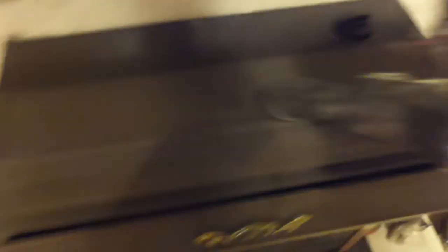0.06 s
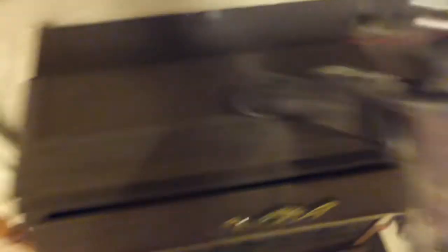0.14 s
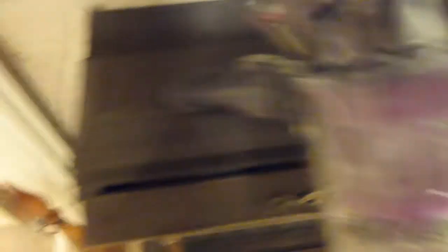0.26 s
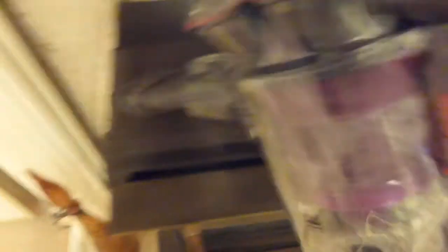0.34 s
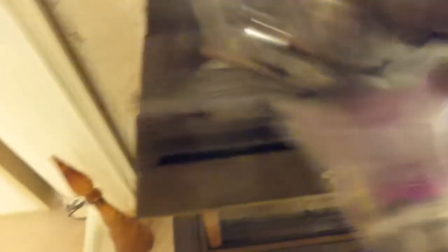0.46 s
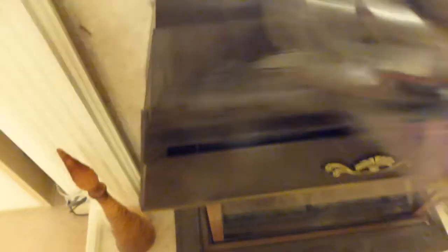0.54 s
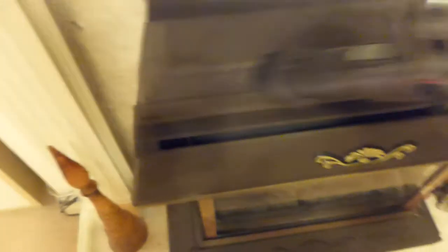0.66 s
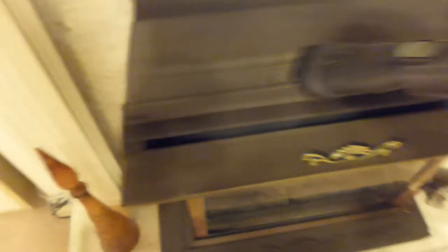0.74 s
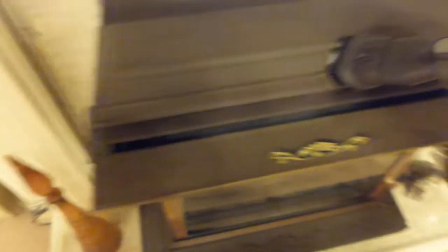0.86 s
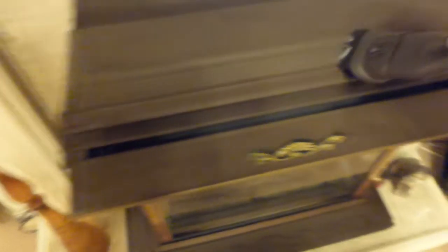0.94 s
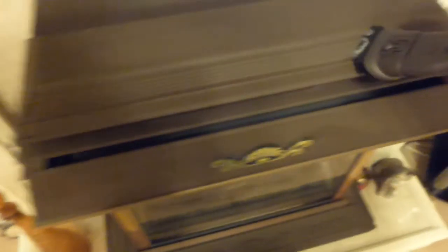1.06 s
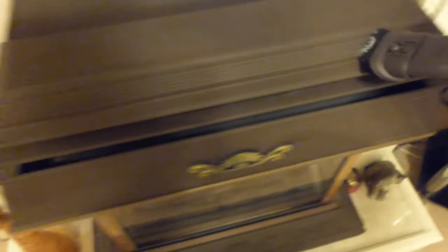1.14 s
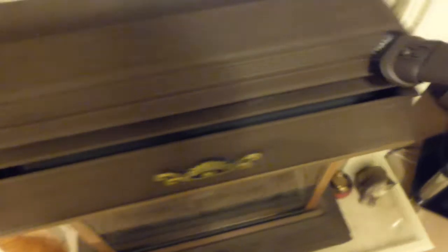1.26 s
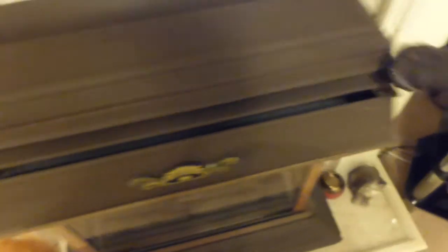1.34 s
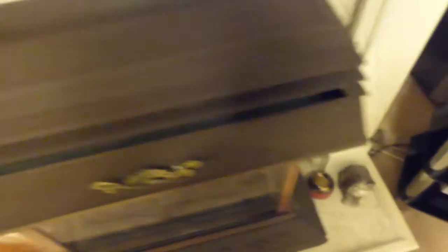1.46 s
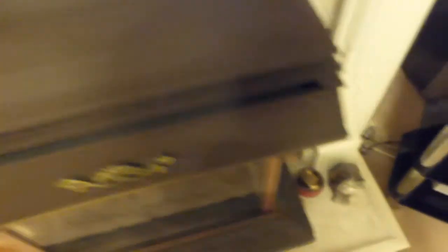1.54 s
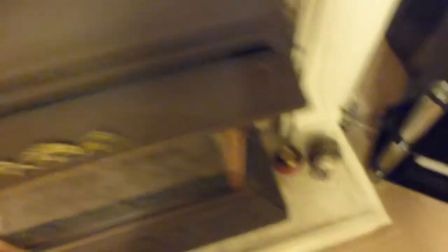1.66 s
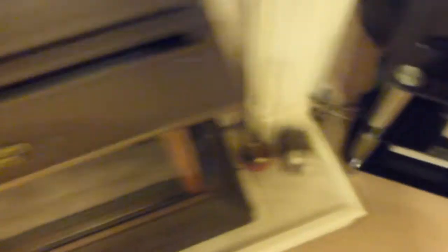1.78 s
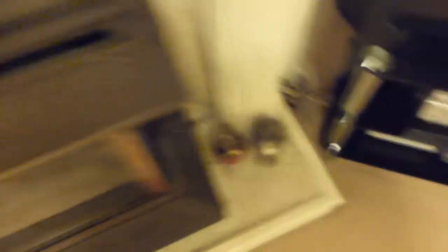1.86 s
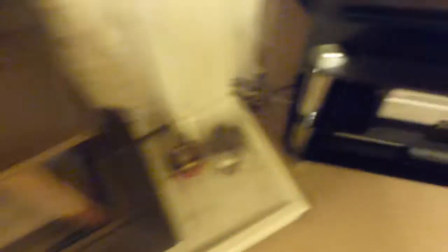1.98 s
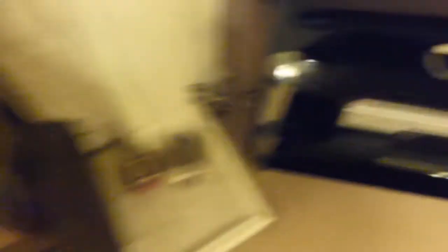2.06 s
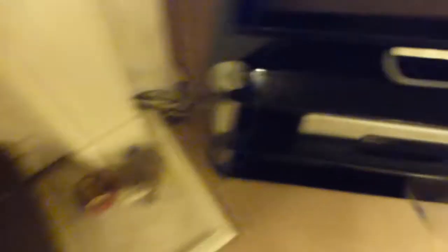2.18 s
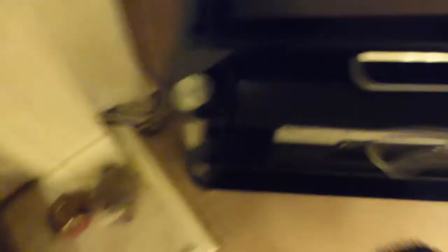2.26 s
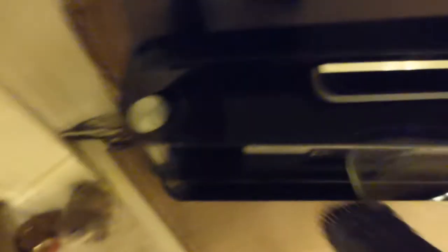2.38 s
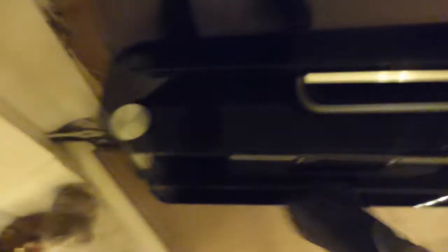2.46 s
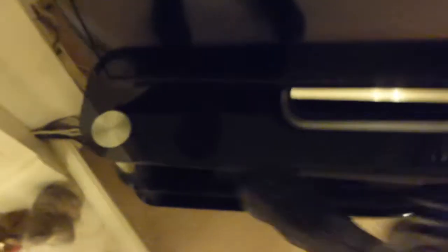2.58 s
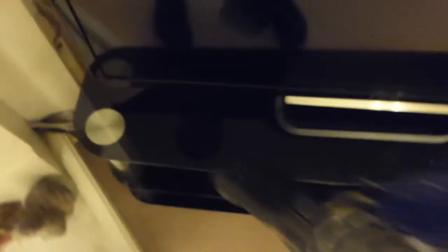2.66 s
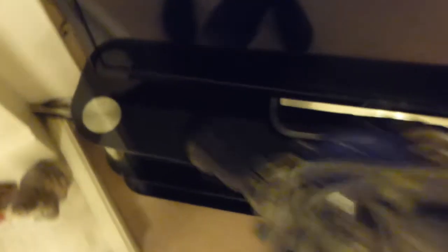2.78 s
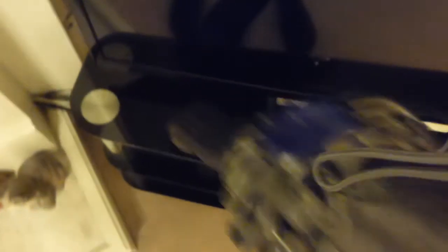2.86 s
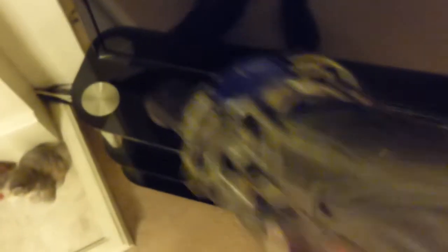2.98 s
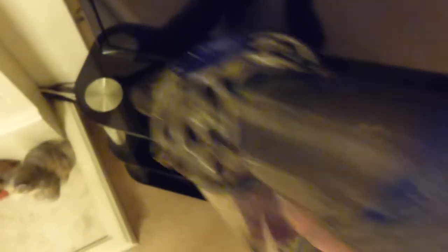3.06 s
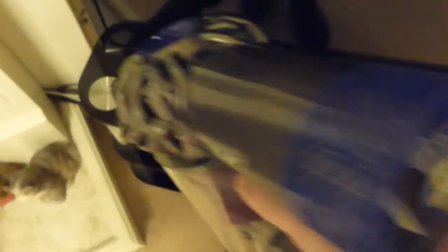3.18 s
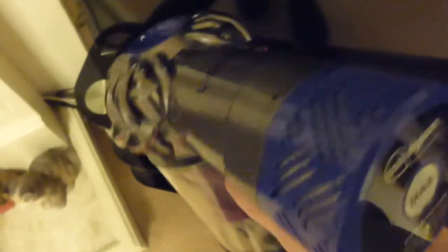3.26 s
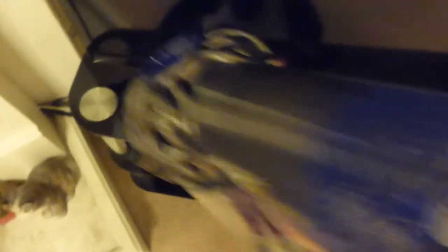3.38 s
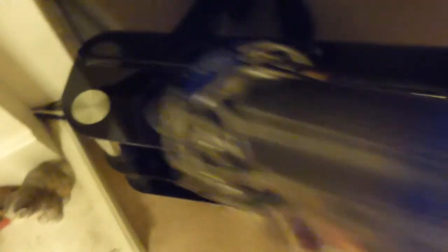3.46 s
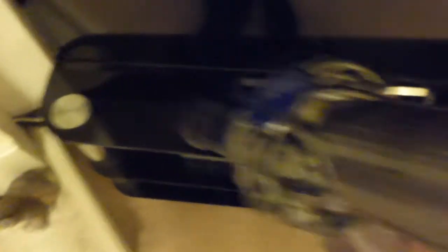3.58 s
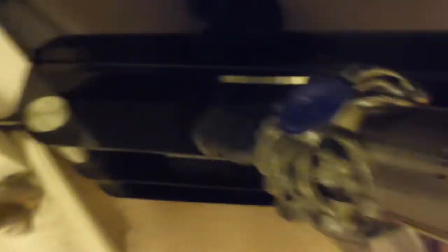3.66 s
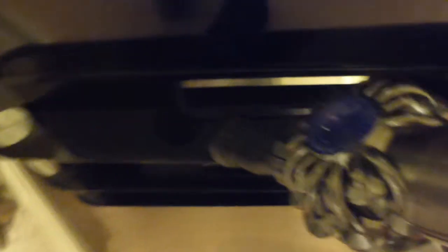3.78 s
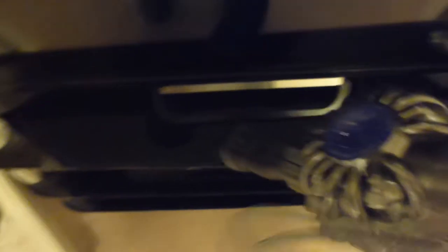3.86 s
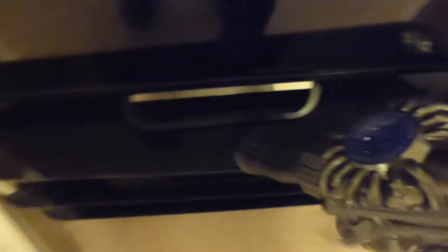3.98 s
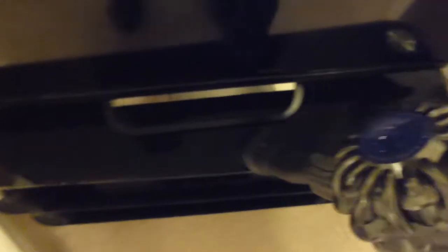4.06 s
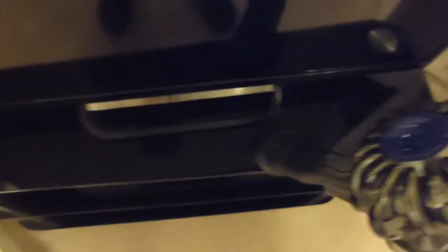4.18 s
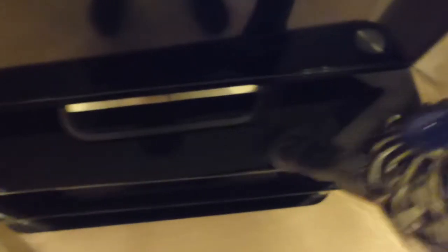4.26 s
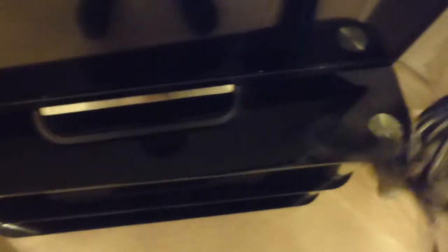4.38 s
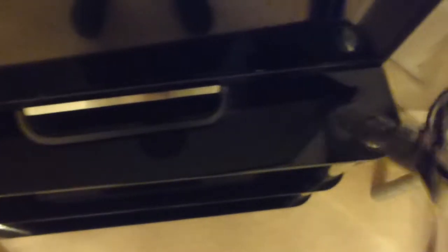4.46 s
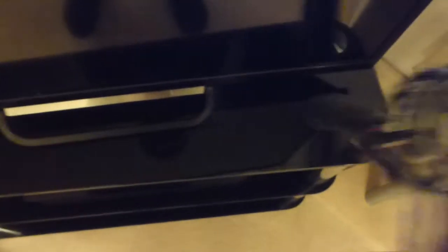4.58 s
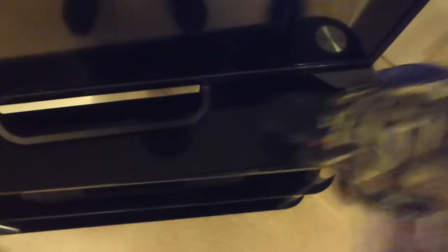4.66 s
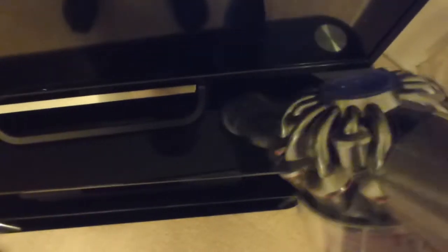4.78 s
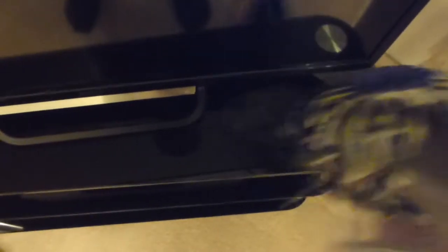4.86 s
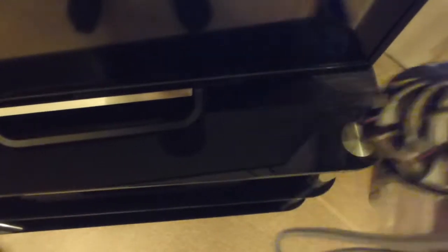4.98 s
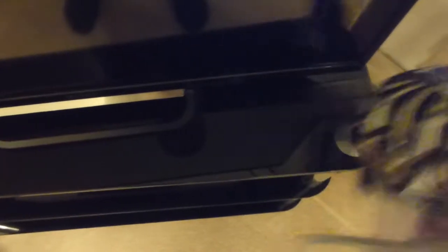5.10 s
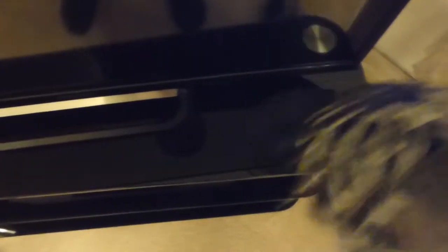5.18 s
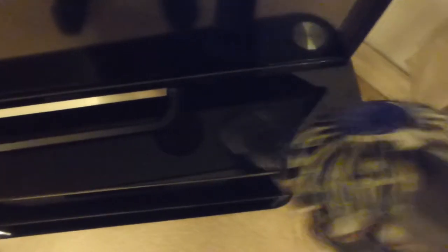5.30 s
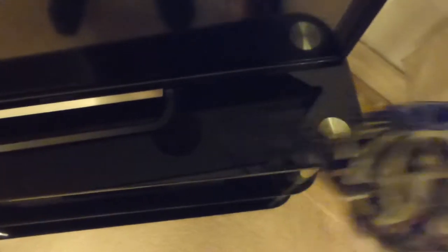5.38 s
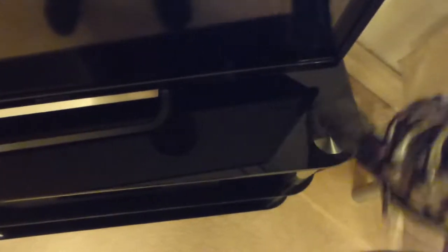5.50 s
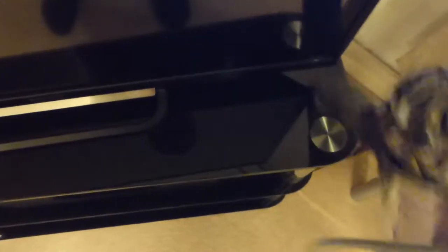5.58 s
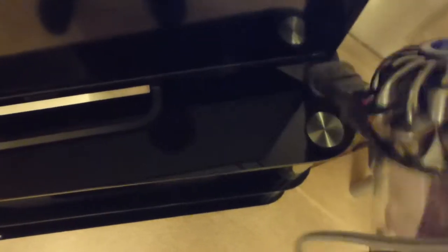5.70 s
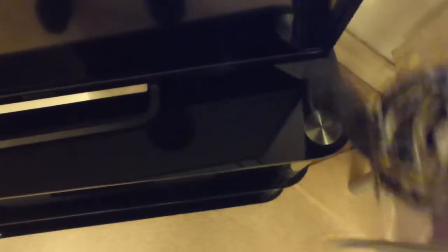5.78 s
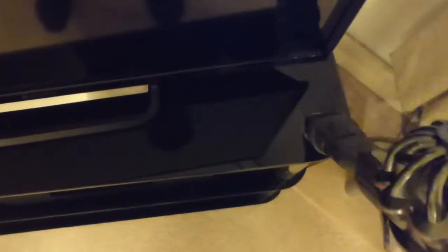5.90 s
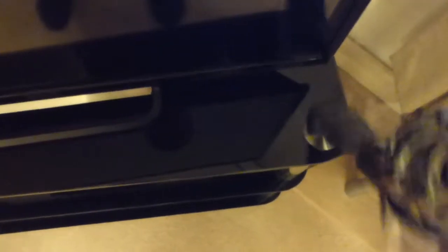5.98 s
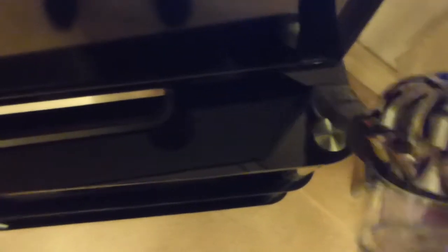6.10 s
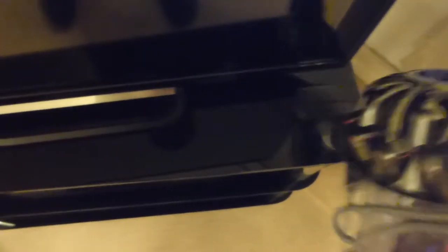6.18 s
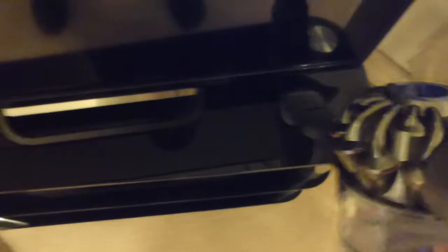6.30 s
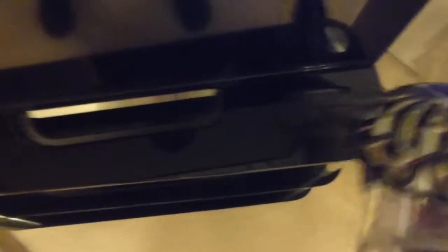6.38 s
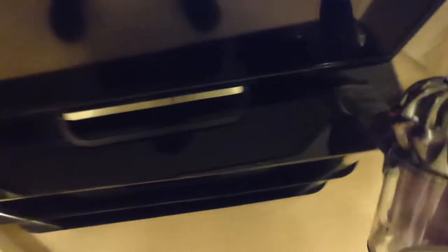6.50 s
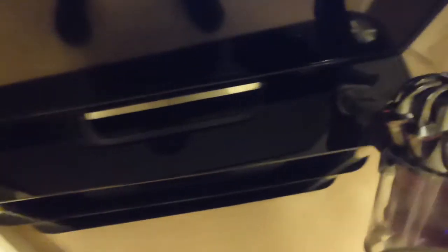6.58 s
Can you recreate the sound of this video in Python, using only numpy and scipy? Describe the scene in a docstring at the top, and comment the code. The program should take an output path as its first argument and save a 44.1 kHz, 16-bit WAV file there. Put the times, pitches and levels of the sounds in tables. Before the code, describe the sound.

Close handheld vacuum whine and suction hiss, early exhaust buffeting, a sliding wind-down, then a buzzing restart and steady running to the end.

```python
"""A cordless hand vacuum is the main source: tones at multiples of its shaft speed, a whine over rushing air.
The trigger is let go, the rotor coasts down against drag and friction, then a kick restarts it.
The air is turbulent noise whose colour follows rotor speed and place, with ducts and a nozzle gap resonating.
Early exhaust gusts buffet the microphone as low noise lumps and suction pulses; ticks and knocks are
decaying resonances, a start buzz rings the casing, and a living room answers with decaying random echoes."""
import sys
import numpy as np
from scipy import signal
from scipy.fft import rfft, irfft
from scipy.io import wavfile
from scipy.ndimage import uniform_filter1d

SR = 44100
rng = np.random.default_rng(int(sys.argv[2]) if len(sys.argv) > 2 else 0)


def digitize_waveform(pressure):
    """Quantize a signal to 16-bit integers and store it at the path in sys.argv[1].

    Rows of a 2-D input are taken as channels; values are limited to [-1, 1].
    """
    field = np.atleast_2d(pressure).T
    bounded = np.clip(field, -1, 1)
    quanta = np.round(bounded * 32767).astype(np.int16)
    wavfile.write(sys.argv[1], SR, quanta)


N = 292824
T = np.arange(N) / SR  # time/s

# Gusts of exhaust on the microphone, before lumps and the overall trim:
# [peak t/s, level/dB, decay/(dB per s), upper part level/dB re the gust]
GUSTS = [(.345, -25, 62, -8), (.538, -26, 60, -2), (.6, -27, 45, 1), (.93, -28, 350, -5),
         (1.036, -33, 90, -11), (1.53, -31.5, 60, -13), (1.628, -30, 140, -12), (1.994, -46, 350, 4.5)]
# Colour of the low part of the gusts: [f/Hz, level/dB per Hz]
GUST_SPECTRUM = [(12, -49), (20, -19), (66, 0.5), (102, 8.5), (155, 2.5), (231, -7.5), (300, -12),
                 (390, -45), (660, -120)]
# Single eddies that pull the membrane: [t/s, peak level/dB, width/ms (nominal; 0.77 of it sets the pulse)]
EDDIES = [(.349, -14.5, 1.36), (.366, -16.5, 1.9), (0.386, -22, 2.7), (.401, -16, 1.4), (.414, -25, 2.3),
          (.425, -20, 1.9), (.46, -20, 1.7), (.525, -19, 2.4), (.543, -16, 1.9), (.59, -20, 1.7),
          (.601, -19, 1.1), (.61, -25, 2.2), (.623, -17, 1.8), (.638, -19, 2.1), (.677, -18, 2),
          (.698, -26, 1.4), (.717, -22, 2.5), (0.771, -17, 2.2), (.926, -20, 2.6), (1.035, -26, 2.3),
          (1.434, -24, 1.9), (1.613, -25, 3.9)]
# Dull knocks of the body: [t/s, blow level/dB, hardness/(dB per octave on the higher modes)]
KNOCKS = [(1.905, -40, -10), (1.985, -38, -14), (2.762, -27, -7), (3.656, -34, 5), (5.55, -37, -6)]
# Modes of the hollow body: [f/Hz, level/dB re the blow, t60/s]
BODY_MODES = [(105, -1, 0.076), (231, -3, 0.14), (454, -3, .07), (688, 5, 0.11)]
# Plastic ticks of the trigger: [t/s, drive level/dB before the ring, ring f/Hz, drive t60/s]
TICKS = [(2.555, -40, 2500, 0.027), (2.629, -44.5, 9000, 0.026), (2.709, -38, 2700, 0.028)]
# Buzz of the coils: [t/s, hold/s, drive level/dB]
START_BUZZ = [(2.748, .014, -38.5), (2.777, 0.017, -33.5)]
# Casing resonances the coils ring: [f/Hz, width/Hz, level/dB re the drive]
CASING = [(6170, 650, 3), (3480, 660, 1.5), (11000, 1500, -13)]

# Air at full speed as the machine moves about, before the restart swell and the remnant:
# [t/s, intake rush level/dB, cyclone roar, exhaust hiss, low body: level/dB re the rush]
AIR = [(0, -23, -2.5, -11, -6.5), (.24, -22.5, -3, -9.5, -6), (.6, -26, -3.5, -9.4, -4),
       (.96, -26.5, -3, -9.3, -3.5), (1.2, -25, -6, -10.5, -5.5), (1.44, -25.5, -1, -9.5, -5),
       (1.58, -23.5, -3, -12.5, -7), (1.78, -26, 2, -8.5, -6.5), (2.86, -24.5, -3.5, -5.5, -3.5),
       (3.05, -27, 2.5, -3.5, 0), (3.29, -24, -2, -6.5, -8), (3.7, -27, -1.7, -5.5, -0.5),
       (4.13, -25.5, -2.5, -8, -6), (4.37, -26, -1.5, -7.5, -8.5), (4.65, -25, -1.5, -4.8, -5.5),
       (4.97, -26, -1.5, -5.5, -8), (5.21, -26.5, -1.5, -4, -6), (5.55, -23.5, -5, -8.5, -9.5),
       (5.72, -26.5, -0.5, -5, -8), (5.93, -26, -2.5, -7.5, -11), (6.05, -25.5, -3, -7, -9.5),
       (6.29, -27, -1.2, -3.5, -1), (6.41, -26.5, -1, -5.5, -8), (6.64, -26.5, -1.7, -3.5, -8)]
# Colour of the air at full speed by the cabinet: [f/Hz, level/dB per Hz]
RUNNING = [(18, -70), (30, -40), (193, -15), (494, -11), (713, -1), (976, -5), (1060, -6.5), (1140, -3.5),
           (1480, -2.5), (3010, -8), (4120, -10.5), (5950, -11), (7140, -7.5), (13400, -14.5), (15700, -30)]
# Colour of the air at full speed with the exhaust towards the microphone: [f/Hz, level/dB per Hz]
RUNNING_FACING = [(150, -51), (250, -22.5), (965, -1.5), (1050, -7.5), (1390, -2.5), (1770, -2), (2330, -4),
                  (4130, -11), (6590, -16.5), (7190, -18), (7980, -22), (13400, -25.5), (15700, -42)]
# Colour of the air at low speed: [f/Hz, level/dB per Hz]
COASTING = [(18, -55), (30, -14), (225, -9.5), (271, -13), (361, -6), (951, -7), (1110, -9), (1370, -5.5),
            (1980, 0), (2200, -4), (4700, -9.5), (5790, -17), (15700, -37)]
# Duct resonances: [f/Hz, width/Hz, boost level/dB]
DUCTS = [(176, 44, 2.5), (670, 190, 2), (3930, 870, 4), (4730, 200, 2), (6910, 280, 4.5), (11900, 560, 0),
         (13300, 410, 0)]
# The nozzle gap and nearby surfaces ring in three strands:
# [t/s, low f/Hz, boost level/dB, middle f/Hz, boost level/dB, high f/Hz, boost level/dB]
NOZZLE = [(0, 1910, 7, 2070, 8, 3300, 2), (.7, 1710, 6.5, 2080, 8, 3300, 3),
          (1.1, 1710, 7, 2060, 14, 3000, 3), (1.6, 1810, 12, 2130, 1, 3370, 4),
          (2.05, 1800, 5, 2100, 4, 3400, 4), (2.25, 1870, 7, 2080, 12, 3300, 0),
          (2.6, 1900, 1, 2080, 10, 3300, -2), (2.85, 1690, 6.5, 2200, 4, 2730, 2),
          (3.4, 1640, 4, 1870, 9, 2800, 10), (3.9, 1360, 4.5, 1730, 7.5, 2760, 3),
          (4.2, 1670, 6, 1940, 5.5, 2850, 6), (4.55, 1670, -4, 1960, 6, 2900, -1),
          (4.8, 1400, 2, 1770, 1, 2340, 3), (5.05, 1500, 6, 1740, 8.5, 2330, -1),
          (5.27, 1490, 2.5, 1800, -6, 2170, 6), (5.48, 1550, 6, 1800, 3, 2090, 12),
          (5.58, 1660, 8, 1860, 10.5, 2110, 7), (5.74, 1620, 5, 1800, 7, 2100, 3),
          (5.92, 1600, 0, 1850, 0, 2110, 13), (6.15, 1580, 6, 1810, 4, 2150, 0),
          (6.4, 1500, 3, 1800, 8, 2300, 2), (6.64, 1450, 0, 1760, 7, 2300, 1)]
# Small steady side level, a faint noise of opposite sign left and right: [f/Hz, level/dB re the centre]
SIDE_DB = [(60, -12), (180, -22), (550, -23.5), (1650, -30), (4970, -20.5), (15000, -18)]
# Loss of air level per tenfold drop in speed: [rush, roar, hiss, body: loss/dB]
SLOWING_DB = 34, 47.3, 78.5, 46
# A remnant that fades more gently, at full speed: [rush, roar, hiss, body: level/dB]
QUIET_DB = -51, -49, -56, -46
# Loss of that remnant per tenfold drop in speed: [rush, roar, hiss, body: loss/dB]
REMNANT_LOSS_DB = 9.4, 18, 15, 4.6

# After the catch, the speed closes on full speed in two steps: [shortfall/Hz, time constant/s]
LAGS = [(114, .0105), (134, .106)]
# Unbalance tone, 1 x shaft, under power: [t/s, level/dB]
SHAFT_TONE = [(0, -48), (.2, -34.5), (.5, -31.5), (1.35, -31), (1.5, -35), (1.6, -27.5), (1.77, -44),
              (2.78, -42), (2.8, -22), (2.92, -25), (3.02, -37.5), (3.27, -44), (3.47, -39), (3.6, -32),
              (3.78, -27), (3.97, -33.5), (4.2, -29), (4.4, -38.5), (4.57, -30.5), (4.95, -39),
              (5.27, -33.5), (5.52, -31), (5.72, -36), (5.95, -30.5), (6.35, -38.5), (6.47, -33),
              (6.6, -42)]
# 7 x shaft (blades) under power: [t/s, level/dB]
BLADE_TONE = [(0, -36.5), (1.3, -35), (3, -30), (3.9, -36.5), (4.9, -32), (6.1, -30), (6.64, -34.5)]
# 14 x shaft under power: [t/s, level/dB]
OCTAVE_TONE = [(0, -48), (.5, -58), (1.7, -62), (2.9, -52), (3.6, -64), (4.2, -56), (6.64, -57)]
# Unpowered tones sliding through the casing's resonances, 1, 4, 7 and 14 x shaft: [tone f/Hz, level/dB]
SHAFT_SLIDE = [(170, -68), (230, -62), (290, -46.5), (350, -47), (450, -38.5), (660, -35.5), (800, -32),
               (940, -26), (1050, -35)]
POLE_SLIDE = [(690, -35.5), (960, -37), (1150, -44), (1500, -50), (1700, -61), (2500, -57), (2900, -40),
              (3400, -20), (3800, -28), (4100, -48), (4210, -32)]
BLADE_SLIDE = [(1200, -66), (3000, -52), (5500, -46), (6600, -35), (7370, -48)]
OCTAVE_SLIDE = [(2400, -75), (3500, -68), (3900, -54), (4300, -56), (4800, -66), (7000, -76), (14700, -64)]
# A tone dips where its echoes cancel it: [multiple of the shaft, t/s, depth/dB, half width/s]
DIPS = [(1, 1.85, 11, .015), (1, 1.92, 18, 0.01), (1, 1.975, 11, .012), (1, 2.05, 12, 0.018),
        (1, 2.17, 4, 0.013), (1, 2.25, 8, 0.018), (1, .4, 4, .04), (1, 0.76, 3.5, .08), (1, 1.1, 3, 0.036),
        (4, .4, 9, 0.054), (4, 1.07, 24, 0.14), (4, 1.5, 8, 0.087), (4, 2.352, 18, .012),
        (4, 2.43, 18, .006), (4, 2.573, 25, .0054), (4, 2.703, 7, .008), (4, 2.77, 24, .017),
        (4, 2.88, 1, .02), (4, 2.96, 14, .03), (4, 3.56, 6, .15), (4, 3.92, 9, 0.11), (4, 4.17, 16, 0.043),
        (4, 4.55, 5, 0.086), (4, 5.33, 9, .08), (4, 5.92, 8, 0.085), (4, 6.17, 9, 0.043),
        (4, 6.38, 10, .06), (7, .38, 14, .06), (7, 0.98, 4, 0.11), (7, 1.48, 9, 0.059),
        (7, 1.71, 15, 0.085), (7, 2.8, 25, .06), (7, 3.12, 18, 0.077), (7, 3.46, 20, 0.074),
        (7, 3.67, 6, 0.054), (7, 4.44, 28, 0.11), (7, 4.77, 7, .03), (7, 5.05, 28, 0.059),
        (7, 5.37, 10, 0.047), (7, 5.68, 15, 0.06), (7, 5.93, 15, 0.079), (7, 6.17, 17, 0.044),
        (7, 6.4, 8, .06)]
# Weaker multiples of the shaft speed: [multiple]
POWERED_ORDERS = 2, 3, 5, 6, 8
# Their mean levels at top speed: [level/dB]
POWERED_DB = -45.5, -51.5, -53.5, -48, -58

EDGE_HZ, ROOM_DB = 15650, -21  # upper band limit; level of the room's answer
GUST_RISE_DB_PER_S = 500
DRAUGHT_DB, DRAUGHT_S = -37.5, (.33, 1.64)  # a steady draught between gusts: level, start and end
BUZZ_RISE_DB_PER_S, BUZZ_FALL_DB_PER_S = 3000, 1302
NOZZLE_WIDTH_HZ = 150
# the air is briefly louder at the restart
LOUDER_DB, LOUDER_S, LOUDER_RISE_S, LOUDER_FALL_S = 4.5, 2.805, 0.044, 0.028
WHISTLE_DB, WHISTLE_S, WHISTLE_HALF_S = 4, 2.25, .07  # intake swells as the slowing flow excites the nozzle
FULL_HZ, LOADED_HZ, SETTLE_S = 1054.3, 1051.7, .25  # shaft turns per s, sagging a little over the first sweep
OFF_S, ON_S, CATCH_S = 1.7843, 2.745, 2.8  # trigger let go, pulled again, rotor caught by the drive
AIR_DRAG, FRICTION = .00263, .796  # coasting: loss of speed per s = AIR_DRAG x speed^2 + FRICTION x speed
KICK_SHAPE = 1.4  # exponent: the kick grows ever faster until the drive catches
POLE_DB = -34  # 4 x shaft under power, before the start lift
# the start current lifts the 4th multiple and adds an 8th
START_S, START_HOLD_S, START_POLE_DB, START_EIGHTH_DB = 2.795, .045, 13.5, -31


def gain_of(db):
    """Decibel law: level in dB to amplitude ratio."""
    return 10 ** (np.asarray(db) / 20)


def evened(x):
    """Normalisation: scales to rms 1."""
    return x / np.sqrt(np.mean(x ** 2) + 1e-20)


def read(points, hz):
    """Logarithmic pitch: interpolates a spectrum table over log frequency."""
    f, value = np.transpose(points)
    return np.interp(np.log(hz + 1), np.log(f + 1), value)


def columns(rows, t):
    """Linear interpolation: the columns of a curve table at the times t."""
    s, *values = np.transpose(rows)
    return [np.interp(t, s, v) for v in values]


def swell_db(t, s, hold, rise, fall):
    """Exponential growth and decay: 0 dB from s for hold seconds, straight slopes (dB per s) either side."""
    return -rise * np.maximum(s - t, 0) - fall * np.maximum(t - s - hold, 0)


def wander(corner_hz):
    """Low-pass noise: slow random change of rms 1."""
    spectrum = rfft(rng.standard_normal(N))
    return evened(irfft(spectrum / (1 + (np.fft.rfftfreq(N, 1 / SR) / corner_hz) ** 2), N))


def resonate(x, hz, width):
    """Damped oscillator: one complex pole gives a resonance of about unit gain."""
    r = np.exp(-np.pi * width / SR)
    pole = r * np.exp(2j * np.pi * hz / SR)
    return 2 * signal.lfilter([1 - r], [1, -pole], x).real


def shaped(gain, size):
    """Short-time synthesis: noise from random spectra of the magnitude gain (bins x frames)."""
    real, imag = rng.standard_normal(gain.T.shape + (2,)).T
    return signal.istft(gain * (real + 1j * imag), nperseg=size, noverlap=size * 3 // 4)[1][:N]


def shaft_hz(t):
    """Rotor dynamics: full speed, coasting against drag and friction, a kick, a closing on full speed."""
    first = LOADED_HZ + (FULL_HZ - LOADED_HZ) * np.exp(-t / SETTLE_S)
    ratio = AIR_DRAG / FRICTION
    coasted_s = np.clip(t, OFF_S, ON_S) - OFF_S
    coast = 1 / ((1 / LOADED_HZ + ratio) * np.exp(FRICTION * coasted_s) - ratio)
    closing = FULL_HZ - sum(short * np.exp(-np.maximum(t - CATCH_S, 0) / lag) for short, lag in LAGS)
    kick = np.clip((t - ON_S) / (CATCH_S - ON_S), 0, 1) ** KICK_SHAPE
    return np.where(t < OFF_S, first, coast + kick * (closing - coast))


def room(x, t60=0.28):
    """Reverberation: sparse echoes of random sign decay exponentially, slightly different on the right."""
    taps = np.zeros((2, SR // 2))
    at = np.arange(300, SR // 2 - 20, 20)
    at = at + rng.integers(0, 20, (2, len(at)))
    np.put_along_axis(taps, at, rng.choice([-1., 1.], at.shape), 1)
    taps[1] = taps[0] + 0.084 * taps[1]
    taps *= gain_of(-60 * np.arange(SR // 2) / SR / t60)
    return signal.fftconvolve(x[None], taps / np.linalg.norm(taps[0]), axes=1)[:, :N]


def buffet(lumpy_db=3.0):
    """Flow noise: exhaust rolls over the microphone in low lumps, with an upper part set for each gust."""
    hz = np.fft.rfftfreq(N, 1 / SR)
    low = evened(irfft(rfft(rng.standard_normal(N)) * gain_of(read(GUST_SPECTRUM, hz)), N))
    upper = evened(resonate(resonate(rng.standard_normal(N), 344.0, 240.0), 344.0, 240.0))
    lumps = evened(gain_of(lumpy_db * wander(25.)))
    on, off = DRAUGHT_S
    draught = gain_of(DRAUGHT_DB + swell_db(T, on, off - on, GUST_RISE_DB_PER_S, 70.))
    gusts = [gain_of(db + swell_db(T, s, 0, GUST_RISE_DB_PER_S, fall)) for s, db, fall, _ in GUSTS]
    low_level = np.max(gusts + [draught], axis=0)
    upper_gusts = [gust * gain_of(row[-1]) for gust, row in zip(gusts, GUSTS)]
    upper_level = np.max(upper_gusts + [draught * gain_of(-8.5)], axis=0)
    return gain_of(-3.0) * lumps * (low_level * low + upper_level * upper)


def eddies():
    """Vortex pressure: each eddy is a short suction pulse between two weaker pushes."""
    out = np.zeros(N)
    for s, db, ms in EDDIES:
        u = (T - s) * 1000 / (0.77 * ms)
        out -= gain_of(db) * (1 - u ** 2) * np.exp(-u ** 2 / 2)
    return out


def knocks():
    """Modal decay: a soft-fronted blow rings the hollow body; harder blows favour the higher modes."""
    out = np.zeros(N)
    for s, blow_db, hard_db in KNOCKS:
        t = np.maximum(T - s, 0)
        for hz, db, t60 in BODY_MODES:
            level_db = blow_db + db + hard_db * np.log2(hz / BODY_MODES[0][0])
            envelope = gain_of(level_db - 60 * t / t60) * (1 - np.exp(-t / 0.0027))
            out += envelope * np.sin(2 * np.pi * hz * t)
    return out


def ticks():
    """Damped resonance: short noise puffs excite one broad ring of the plastic."""
    out = np.zeros(N)
    for s, db, hz, t60 in TICKS:
        t = np.maximum(T - s, 0)
        puff = rng.standard_normal(N) * gain_of(db - 60 * t / t60) * (1 - np.exp(-t / .0015))
        out += 2 * resonate(resonate(puff, hz, 0.77 * hz), hz, 0.77 * hz)
    return out


def start_buzz():
    """Forced vibration: current pulses that pull the slow rotor round rattle the casing, as resonant noise."""
    drive = rng.standard_normal(N)
    ring = sum(gain_of(db) * evened(resonate(resonate(drive, hz, width), hz, width))
               for hz, width, db in CASING)
    return ring * sum(gain_of(db + swell_db(T, s, hold, BUZZ_RISE_DB_PER_S, BUZZ_FALL_DB_PER_S))
                      for s, hold, db in START_BUZZ)


def air_levels(t):
    """Speed law of flow noise: rush, roar, hiss and body levels, each a steep part plus a gentler remnant."""
    rush_db, *others_db = columns(AIR, t)
    from_peak = np.where(t < LOUDER_S, (LOUDER_S - t) / LOUDER_RISE_S, (t - LOUDER_S) / LOUDER_FALL_S)
    louder_db = LOUDER_DB * np.exp(-from_peak ** 2)
    decades = np.log10(shaft_hz(t) / FULL_HZ)
    parts_db = [rush_db] + [rush_db + db for db in others_db]
    levels = []
    for db, loss_db, quiet_db, gentle_db in zip(parts_db, SLOWING_DB, QUIET_DB, REMNANT_LOSS_DB):
        steep = gain_of(db + louder_db + loss_db * decades)
        remnant = gain_of(quiet_db + gentle_db * decades)
        levels.append(10 * np.log10(steep ** 2 + remnant ** 2))
    levels[0] = levels[0] + WHISTLE_DB * np.exp(-((t - WHISTLE_S) / WHISTLE_HALF_S) ** 2)
    return levels


def air(patchy_db=1.62, flicker_db=.5, size=1024):
    """Turbulence: noise coloured by rotor speed and place; ducts and nozzle gap resonate, patches drift."""
    hz = np.fft.rfftfreq(size, 1 / SR)[:, None]
    t = np.arange(N * 4 // size + 5) * size / 4 / SR
    rush_db, roar_db, hiss_db, body_db = air_levels(t)
    speed = np.clip((shaft_hz(t) - 300.) / 750.0, 0, 1)
    running = np.where((t < 2.5) & (hz > 300), read(RUNNING_FACING, hz), read(RUNNING, hz))
    db = speed * running + (1 - speed) * read(COASTING, hz)
    strands = columns(NOZZLE, t)
    rings = DUCTS + [(f, NOZZLE_WIDTH_HZ, top) for f, top in zip(strands[::2], strands[1::2])]
    rings += [(4570.0, 380.0, 7.6 * (1 - speed))]  # a duct that keeps whistling as the flow dies
    db = db + sum(top / (1 + (2 * (hz - f) / width) ** 2) for f, width, top in rings)
    power = gain_of(db) ** 2

    def lift(level_db, lo_hz, hi_hz):
        """Band power: the dB that bring one part of the spectrum to its level."""
        band = (hz[:, 0] > lo_hz) & (hz[:, 0] < hi_hz)
        return level_db - 10 * np.log10(power[band].sum(0))

    lifts = (lift(body_db, 450, 950), lift(rush_db, 1100, 3000),
             lift(roar_db, 3000, 6000), lift(hiss_db, 7500, 14500))
    # each frequency blends the lifts of its two neighbouring parts
    corners_hz = [850., 1250., 2500., 3700., 5200., 8500.]
    place = np.interp(np.log(hz + 1), np.log(corners_hz), [0.46, 1, 1, 2, 1.97, 3])
    db = db + sum(np.maximum(1 - abs(place - k), 0) * part for k, part in enumerate(lifts))
    patches = rng.standard_normal((len(t), len(hz))).T
    patches = uniform_filter1d(patches, size=8, axis=0)  # across frequency
    patches = evened(uniform_filter1d(patches, size=34, axis=1))  # across time
    db = db + patchy_db * patches + flicker_db * rng.standard_normal(len(t))
    unit = np.sqrt(np.mean(shaped(np.ones(db.shape), size) ** 2) / len(hz))  # rms of one bin of gain 1
    centre = shaped(gain_of(db), size)
    side = shaped(gain_of(db + read(SIDE_DB, hz)), size)
    return np.array([centre, side]) / unit


def motor(waver=0.00021, flutter_db=1.57):
    """Harmonics of rotation: tones locked to a slightly wavering shaft flutter as the machine moves."""
    hz = uniform_filter1d(shaft_hz(T), size=300)
    turns = np.cumsum(hz * (1 + waver * wander(12.8))) / SR
    idle = (T > OFF_S) & (T < START_S - .015)

    def tone_db(slide, order, powered_db):
        """Resonant transfer: level by frequency while unpowered, by time under power."""
        return np.where(idle, read(slide, order * hz), powered_db)

    start_db = swell_db(T, START_S, START_HOLD_S, 1500., 600.)
    pole_db = POLE_DB + np.maximum(START_POLE_DB + start_db, 0)
    eighth_db = START_EIGHTH_DB + swell_db(T, START_S - .012, .018, 1500., 900.)
    strong = [(1, tone_db(SHAFT_SLIDE, 1, columns(SHAFT_TONE, T)[0])),
              (4, tone_db(POLE_SLIDE, 4, pole_db)),
              (7, tone_db(BLADE_SLIDE, 7, columns(BLADE_TONE, T)[0])),
              (14, tone_db(OCTAVE_SLIDE, 14, columns(OCTAVE_TONE, T)[0])),
              (8, eighth_db)]
    tones = []
    for order, db in strong:
        dips_db = sum(deep * np.exp(-((T - s) / half) ** 2)
                      for of, s, deep, half in DIPS if round(of) == order)
        tones.append((order, uniform_filter1d(db, size=300) - dips_db))
    slowed_db = 54.0 * (1 - hz / hz.max())  # the weaker multiples fade with speed
    tones += [(order, db - slowed_db + 4.9 * wander(5.0)) for order, db in zip(POWERED_ORDERS, POWERED_DB)]
    out = np.zeros(N)
    for order, db in tones:
        level = np.sqrt(2) * gain_of(db + flutter_db * wander(27.0))  # rms to peak
        out += level * np.sin(2 * np.pi * (order * turns + rng.random()))
    return out


def scene():
    """Superposition: the machine and its air in the middle, with a faint side noise, the room around it."""
    centre, side = air()
    machine = motor() + ticks() + knocks() + start_buzz()
    sound = centre + side * np.array([[1], [-1]]) + machine
    return sound + gain_of(ROOM_DB) * room(machine) + buffet() + eddies()


def record(dry):
    """Band limitation: a linear-phase low-pass filter ends the treble at EDGE_HZ."""
    lowpass = signal.firwin(511, EDGE_HZ, window=("kaiser", 9), fs=SR)
    return signal.oaconvolve(dry, lowpass[None], "same")


dry = scene()
out = record(dry)
digitize_waveform(out)
```